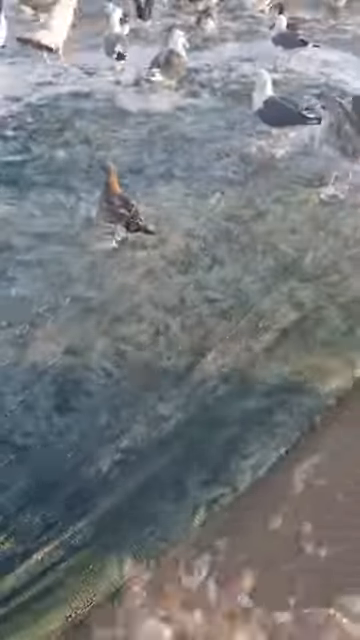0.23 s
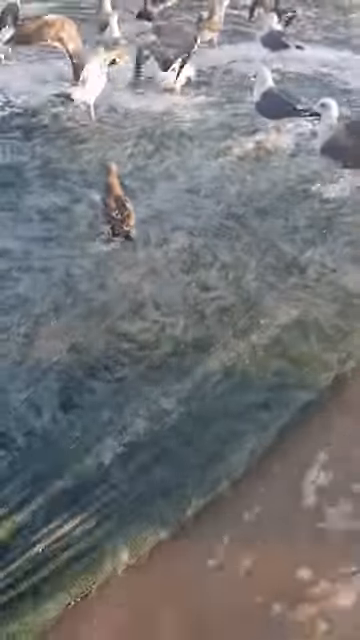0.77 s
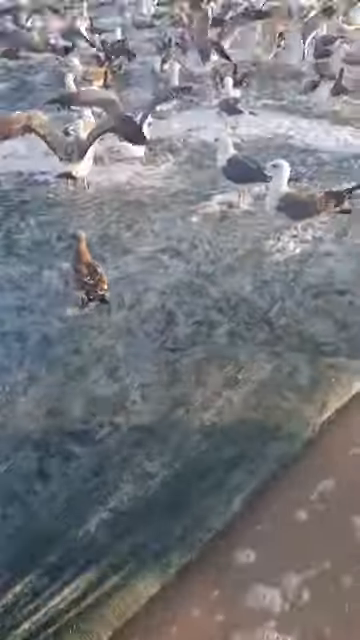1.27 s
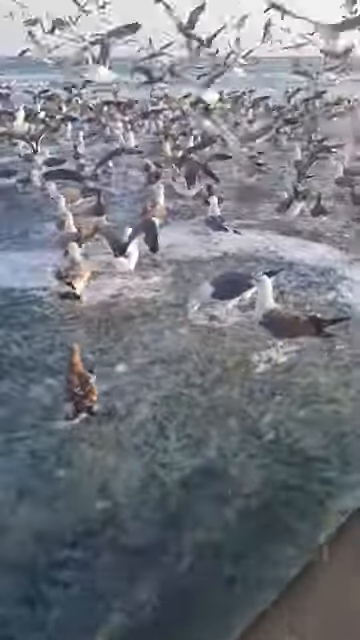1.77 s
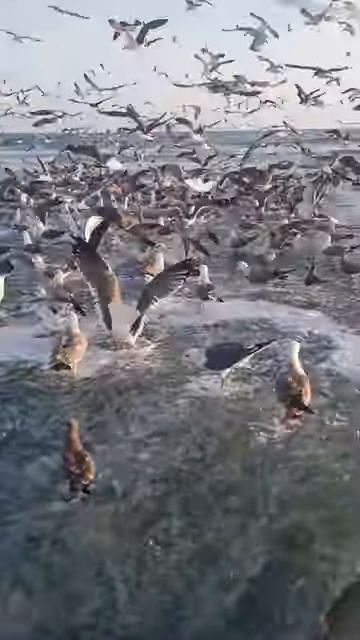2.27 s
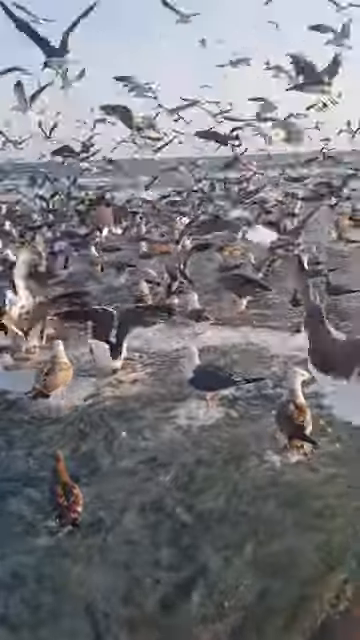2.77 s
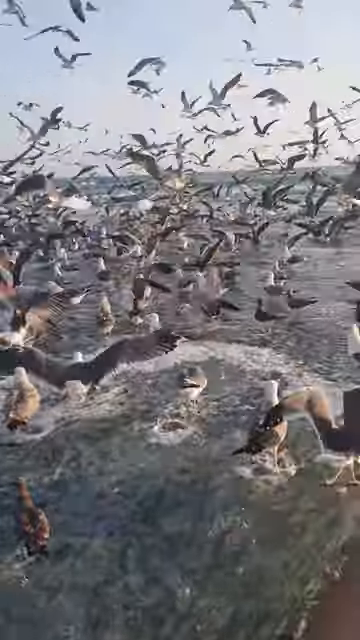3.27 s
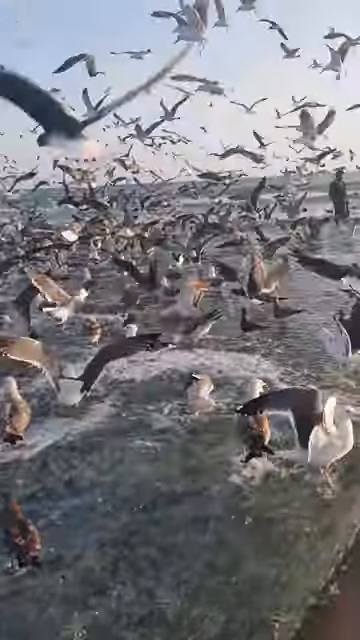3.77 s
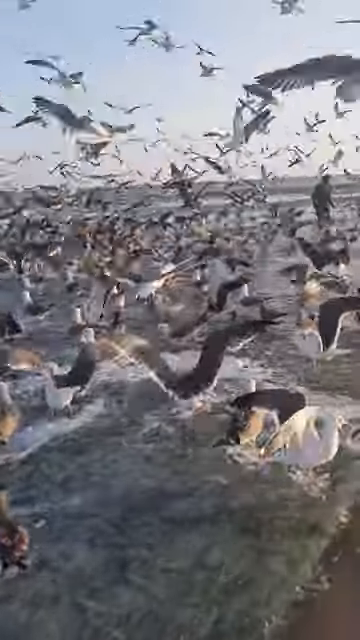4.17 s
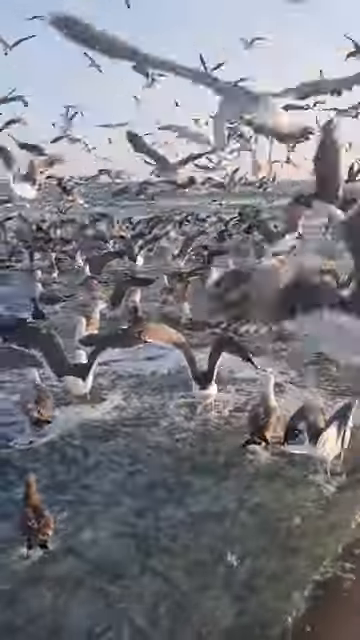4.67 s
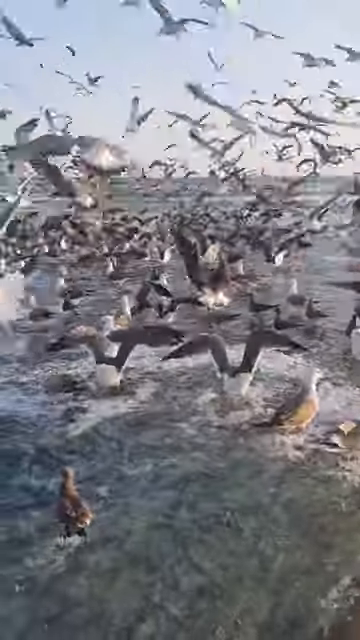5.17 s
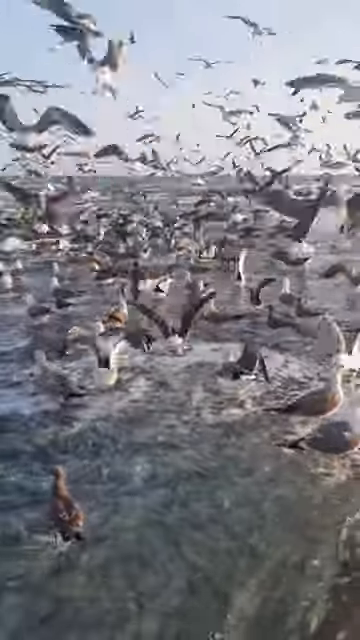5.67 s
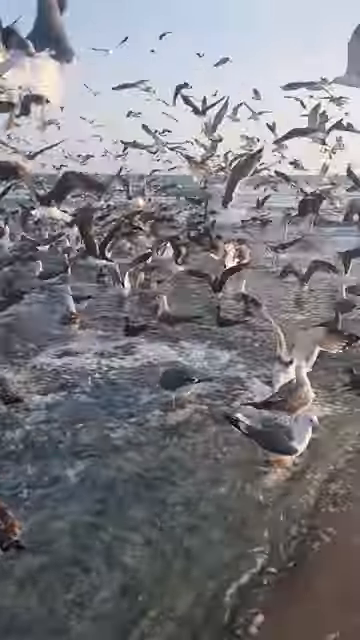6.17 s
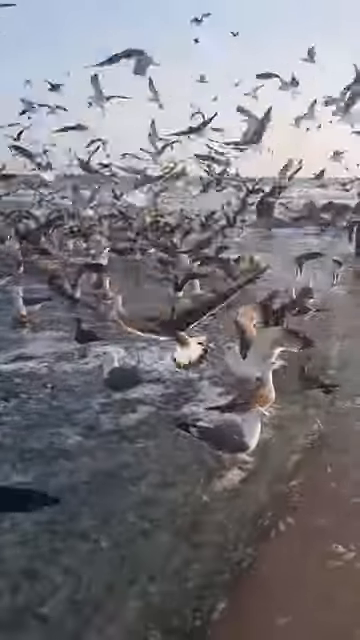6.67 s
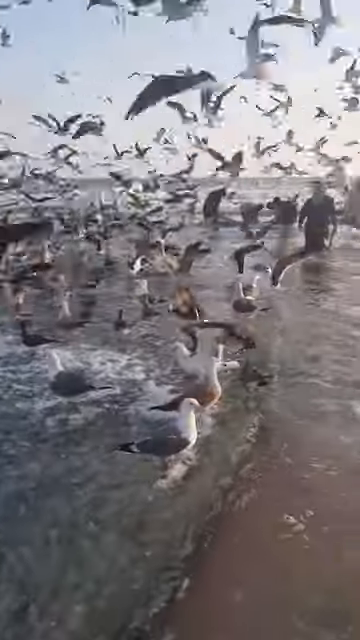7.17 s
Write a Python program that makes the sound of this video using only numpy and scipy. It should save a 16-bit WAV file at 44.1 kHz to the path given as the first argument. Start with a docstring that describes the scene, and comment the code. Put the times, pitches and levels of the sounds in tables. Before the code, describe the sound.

An open beach with a large gull flock, in stereo, lasting about 7.4 s. At first quiet, hoarse single squawks sit over soft low surf and a faint far chorus. From about 1 s near calls come faster and louder, short nasal barks around 1000 Hz in pitch, mostly slightly right, with a faint hollow knock at 1.6 s. Rough, rattling squawks stand out at 2.1 and 2.8 s. Two or three sharp snaps click around 3.5-3.65 s, then strong spaced calls continue to 4.7 s. A young gull squeals high and piercing, breaking in pitch, at 4.8-5.05 s and again at 5.4-5.6 s, amid the loudest squawks. The surf lifts near 5.6 s. From 5.8 to 6.7 s near calls fade to weak croaks with small clicks and drips, and the distant chorus thins. After 6.75 s moderate squawks return and the far flock swells. Bubbles and fine spray spit throughout.

```python
"""Gulls squabbling at the water's edge

Near gulls squawk one by one: pulses and bursts of air, coloured by throat and beak. A young one squeals
with both sides of its voice organ, two sines that mix. Many distant calls blur into a chorus.
Surf made of noise bands washes below, with ringing bubbles that plop and spit, beak snaps, drops and a
hollow knock. Two spaced microphones listen.
"""
import sys
import numpy as np
from scipy import signal
from scipy.fft import rfft, irfft
from scipy.io import wavfile
from scipy.ndimage import uniform_filter1d

SR = 44100
rng = np.random.default_rng(int(sys.argv[2]) if len(sys.argv) > 2 else 0)


def digitize_waveform(pressure):
    """Quantize a signal to 16-bit integers and store it at the path in sys.argv[1].

    Rows of a 2-D input are taken as channels; values are limited to [-1, 1].
    """
    field = np.atleast_2d(pressure).T
    bounded = np.clip(field, -1, 1)
    quanta = np.round(bounded * 32767).astype(np.int16)
    wavfile.write(sys.argv[1], SR, quanta)


N = 326781   # length in samples


def from_db(db):
    """Turn a level in dB into a gain."""
    return 10 ** (np.asarray(db) / 20)


def rms_one(x):
    """Scale a sound to an rms level of 1."""
    return x / np.sqrt(np.mean(x ** 2) + 1e-20)


def at_hz(points, hz):
    """Read a curve between its points, on a logarithmic frequency axis."""
    point_hz, value = np.transpose(points)
    return np.interp(np.log(hz), np.log(point_hz), value)


def drift(rate_hz, size=N):
    """Slow random wandering with spread 1: noise through two equal one-pole low-passes."""
    r = np.exp(-2 * np.pi * rate_hz / SR)
    noise = rng.standard_normal(size + 8000)
    slow = signal.lfilter([1], [1, -2 * r, r * r], noise)[8000:]   # drop the filter's start-up
    return rms_one(slow - slow.mean())


def bandpass(x, order, low_hz, high_hz):
    """Keep one band of frequencies."""
    return signal.sosfilt(signal.butter(order, [low_hz, high_hz], "band", fs=SR, output="sos"), x)


def highpass(x, order, hz):
    """Keep what lies above a frequency."""
    return signal.sosfilt(signal.butter(order, hz, "high", fs=SR, output="sos"), x)


def add(out, x, start_s, late_ms, pan_db):
    """Mix a sound in; the left microphone hears it late_ms later and pan_db softer than the right."""
    for side, sign in enumerate((1, -1)):
        delay_ms = (1 + sign) / 2 * late_ms
        i = int(max(start_s * SR + delay_ms * SR / 1000, 0))
        out[side, i:i + len(x)] += from_db(-sign * pan_db / 2) * x[:N - i]


def squawk(rise_s, fall_s, pitch, rough, beak_hz, throat_db, high_db, throb):
    """Membrane pulses, unsteady and mixed with bursts of air when rough, coloured by throat and open beak."""
    t = np.arange(int((rise_s + fall_s) * SR) + 2) / SR
    size = len(t)
    rough = np.clip(rough, 0, 1)

    arch = np.interp(t, [.012, rise_s, rise_s + fall_s - .012], pitch)
    hz = uniform_filter1d(arch, 300, mode="nearest") * (1 + .038 * rough * drift(200, size=size))
    phase = 2 * np.pi * np.cumsum(hz) / SR
    order = np.arange(1, int(15000 // max(pitch)))[:, None]
    pulses = np.cos(order * phase + 0.124 * order ** 2).sum(0)
    # alternating strong and weak cycles add tones halfway between the harmonics
    pulses *= 1 + rough * drift(40, size=size) * np.cos(phase / 2)
    rasp = rms_one(rng.standard_normal(size) * (1 + np.cos(phase)))   # one air burst per cycle
    air_share = .05 + .6 * rough ** 3
    source = np.sqrt(1 - air_share) * rms_one(pulses) + np.sqrt(air_share) * rasp

    f = np.fft.rfftfreq(size, 1 / SR) + 1
    width_octaves = np.where(f > beak_hz, .4, .42)
    beak = 1 / (1 + (np.log2(f / beak_hz) / width_octaves) ** 2) ** 2
    beak += 0.48 / (1 + ((f - 1.527 * beak_hz) / 700) ** 2)   # second resonance of the gape
    throat = from_db(throat_db) / (1 + (600 / f) ** 8) / (1 + ((f - 1500) / 600) ** 2)
    hiss = from_db(high_db - 3.5) / (1 + (5000 / f) ** 4) / (1 + f / 8000)
    body = irfft(rfft(source) * (beak + throat), size)
    edge = irfft((0.63 * rfft(source) + 0.66 * rfft(rasp)) * hiss, size)

    effort = np.interp(t, [0, rise_s, rise_s + fall_s], [.03, 1, .03])
    swell = np.sin(np.pi / 2 * effort) ** 1.414
    voice = rms_one(body + edge * swell ** 0.52)   # brightest at full effort
    # a rattle of about 86 Hz chops the voice into bursts, then dies away
    rattle = np.cos(2 * np.pi * 86 * (t - rise_s) + 0.71 * drift(21, size=size))
    beat = np.exp(throb * np.exp(-t / 0.12) * (rattle - 1))
    return voice * swell * beat * from_db(2.5 * rough * drift(90, size=size))


def near_gulls():
    """Single squawks; birds to the right reach the left microphone late and softer."""
    # one near squawk per row: start/s, loudest moment/s, end/s, top pitch f/Hz, pitch arch/share of top,
    # level/dB, roughness (held to 0-1), beak resonance f/Hz, setting of the high hiss/dB, left ear late/ms
    squawks = [(0.064, 0.098, .12, 1400, 0, -39, 0.85, 1530, -14, -0.091),
               (0.148, .184, .21, 1187, 0, -32.5, 1, 1290, -7, 0.15),
               (0.192, 0.246, .28, 924, 0.083, -22, 0, 4400, -17, .21),
               (0.292, .313, .39, 906, 0.015, -31, 1.2, 3900, -13, 0.2),
               (0.389, 0.435, .465, 937, 0.21, -23.5, .15, 3700, -11.5, 0.2),
               (0.534, 0.55, .588, 862, 0.075, -28, 0.62, 2300, -11, -0.0076),
               (0.646, 0.679, .705, 805, .03, -31, 0.96, 1660, -14, 0),
               (0.709, 0.73, .775, 1085, 0, -28.5, 1.1, 2920, -12, 0),
               (0.861, 0.883, .924, 867, .09, -28, 1.1, 2500, -11.5, 0.022),
               (.942, 0.971, 1.005, 675, 0.14, -24, 0.07, 3000, -18, 0.23),
               (0.984, 0.996, 1.03, 872, .05, -25, 1.07, 1750, -15, 0.2),
               (1.04, 1.068, 1.122, 1055, 0.2, -18, 0.42, 3620, -13.5, 0.21),
               (1.142, 1.182, 1.217, 917, 0.19, -22, 0.2, 3400, -11, .22),
               (1.231, 1.267, 1.318, 995, 0.3, -19.5, .4, 3320, -3, 0.043),
               (1.381, 1.427, 1.5, 777, 0.083, -31.5, 0.9, 2100, -8, -0.24),
               (1.567, 1.6, 1.626, 900, 0.17, -30, .6, 2140, -8, -0.046),
               (1.652, 1.688, 1.726, 1041, 0.19, -16.5, 0.54, 3240, -15, 0.22),
               (1.751, 1.798, 1.85, 988, 0.24, -20, 0.48, 3240, -13.5, 0.22),
               (1.857, 1.91, 1.95, 1036, 0.19, -18, 0.37, 3500, -15.5, 0.22),
               (1.939, 1.962, 2.03, 1083, 0.25, -26, 0.42, 3370, -12, 0.26),
               (2.075, 2.083, 2.192, 1172, .02, -17.5, 1.1, 2980, -7, 0.38),
               (2.182, 2.238, 2.315, 1002, .11, -26.5, 1, 2560, -14, 0.075),
               (2.38, 2.413, 2.45, 897, 0.11, -25.5, 0.82, 2560, -23, 0),
               (2.524, 2.56, 2.602, 1001, 0.057, -17, 1.1, 3200, -15, -0.13),
               (2.631, 2.668, 2.7, 830, 0.0043, -33, 1.1, 1680, -20, -0.24),
               (2.711, 2.731, 2.779, 857, 0.057, -16, 0.83, 3450, -11, 0.36),
               (2.791, 2.812, 2.857, 1199, 0.034, -12.5, 0.67, 3230, -6, .46),
               (2.918, 2.948, 2.97, 885, 0, -31.5, 0.96, 2510, -9, 0.2),
               (2.974, 2.993, 3.04, 924, 0.18, -24, 0.4, 2290, -21, 0.17),
               (3.064, 3.128, 3.169, 1014, 0.063, -14, 0.97, 3000, -32, 0.27),
               (3.196, 3.308, 3.33, 999, 0.014, -30, 1.05, 2880, -19, 0.29),
               (3.335, 3.362, 3.428, 1077, 0.14, -21, 0.83, 3200, -6.5, .36),
               (3.647, 3.677, 3.725, 1085, 0.26, -20.5, 0.64, 2620, -15, 0),
               (3.761, 3.818, 3.849, 1102, 0.038, -33, 0.9, 2880, -14, 0.3),
               (3.879, 3.929, 3.977, 868, 0.22, -19, 0.71, 2720, -8.5, -0.069),
               (3.991, 4.005, 4.06, 992, 0.032, -30, 0.77, 2810, -17, 0.31),
               (4.129, 4.208, 4.245, 985, 0.098, -20.5, 0.78, 2570, -17.5, 0),
               (4.327, 4.345, 4.418, 1075, 0.11, -16.5, 0.66, 3000, -14.5, .06),
               (4.495, 4.542, 4.583, 1096, .07, -13, 0.72, 2710, -14.5, 0),
               (4.612, 4.659, 4.68, 1087, 0.07, -32, .77, 3200, -14, 0.078),
               (4.686, 4.712, 4.77, 927, .02, -23.5, 1.1, 2100, -20, 0.22),
               (4.99, 5.011, 5.062, 1113, .06, -17, 1.06, 2720, -16, .1),
               (5.07, 5.119, 5.26, 1096, 0.11, -33, .5, 3040, -17.5, 0.296),
               (5.349, 5.371, 5.395, 1275, 0.12, -12, 0.53, 3080, -15.5, .15),
               (5.389, 5.419, 5.445, 1242, 0.013, -19.5, 0.56, 3260, -15, 0.16),
               (5.536, 5.57, 5.61, 1145, .04, -18.5, 1, 3520, -24, .27),
               (5.597, 5.631, 5.69, 1066, 0.036, -16, 0.8, 2780, -20, 0.3),
               (5.244, 5.267, 5.3, 898, .05, -35, .8, 1500, -22, 0.14),
               (5.718, 5.75, 5.908, 1135, 0.046, -29.5, 0.93, 2670, -9.5, .29),
               (6.064, 6.067, 6.15, 798, 0, -37.5, 1.1, 2110, 0, 0.072),
               (6.255, 6.285, 6.31, 776, 0, -38.5, 0.65, 1670, -1, 0.38),
               (6.345, 6.368, 6.39, 793, 0, -42.5, 1.1, 1500, 19, 0.27),
               (6.417, 6.466, 6.49, 869, .16, -33, 0, 3060, -7, 0.21),
               (6.657, 6.728, 6.745, 650, 0.12, -33.5, 0.93, 1400, -21, 0.14),
               (6.741, 6.765, 6.815, 830, 0.087, -23, 0.88, 2880, -24, 0.12),
               (6.867, 6.9, 6.925, 1420, 0.035, -33, 0.85, 2800, -14, 0.078),
               (6.944, 7.028, 7.07, 1008, .12, -25.5, 0.71, 2850, -24, 0.25),
               (7.076, 7.112, 7.175, 1174, 0.18, -24, 0.6, 3170, -12, -0.22),
               (7.188, 7.208, 7.259, 1150, 0.0082, -29.5, 1.1, 2300, -14, 0.2),
               (7.265, 7.286, 7.381, 810, 0.011, -30.5, 1.1, 2500, -12, 0.14)]
    # moments inside the squawks that a rattle breaks up: t/s
    rattling_s = [2.09, 2.81]
    out = np.zeros((2, N))
    for start, top, end, top_hz, arch, level_db, rough, beak_hz, high_db, late_ms in squawks:
        throb = 2.4 * any(start < s < end for s in rattling_s)
        # the pitch climbs to its top, then sinks by 0.9 of that climb
        pitch = top_hz * (1 - np.clip(arch, 0, .5) * np.array([1, 0, .9]))
        throat_db = -6.5 - 0.66 * (level_db + 19)   # louder calls have a smaller share of throat
        call = squawk(top - start + 0.00932, end - top + 0.0084, pitch, rough, beak_hz,
                      throat_db, high_db, throb)
        add(out, from_db(level_db) * call, start - .01, late_ms, -.5 + 22 * late_ms)
    return out


def yelp(start, climb_s, hold_s, start_hz, top_hz, before_db, after_db):
    """Points (s, Hz, dB) of a high note: a climb, a break down to one pitch, a sagging and fading hold."""
    break_s, landing_hz, sag_hz_per_s, fade_db = 0.013, 3343, 2500, -3
    top_s = start + climb_s
    landed = top_s + break_s
    return [(start, start_hz, before_db), (top_s, top_hz, before_db), (landed, landing_hz, after_db),
            (landed + hold_s, landing_hz - sag_hz_per_s * hold_s, after_db + fade_db)]


def pipe(start, swell_s, fade_s, start_hz, level_db):
    """Points (s, Hz, dB) of a low note: a swell and fade on a sagging pitch."""
    sag_hz_per_s, edge_db = 3030, -6.5
    return [(start + s, start_hz - sag_hz_per_s * s, level_db + db)
            for s, db in ((0, edge_db), (swell_s, 0), (swell_s + fade_s, edge_db))]


def whistle(notes):
    """One membrane: an unsteady, fluttering sine along each note."""
    out = np.zeros(N)
    for note in notes:
        s, hz, db = np.transpose(note)
        i = np.arange(int(s[0] * SR), int(s[-1] * SR))
        unsteady_hz = np.interp(i / SR, s, hz) * (1 + 0.026 * drift(260, size=len(i)))
        phase = 2 * np.pi * np.cumsum(unsteady_hz) / SR
        level = from_db(np.interp(i / SR, s, db) + 3.15 * drift(74, size=len(i)))
        out[i] += np.sqrt(2) * level * np.sin(phase) * signal.windows.tukey(len(i), .15)
    return out


def young_gull():
    """Two voices share one windpipe: squaring their sum gives octaves and the sum tone; air rasps along."""
    # high voice: start/s, climb time/s, hold time/s, start f/Hz, top f/Hz,
    # level before the break/dB, level after it/dB
    yelps = [(4.79, 0.012, 0.047, 3216, 3350, -28.5, -20), (4.855, 0.058, 0.069, 4490, 5180, -22.5, -17.5),
             (5.43, .013, 0.056, 5040, 4950, -26, -15.5), (5.506, .02, 0.0175, 4360, 4450, -23, -16)]
    # low voice: start/s, swell time/s, fade time/s, start f/Hz, level/dB
    pipes = [(4.818, 0.013, .016, 2403, -9), (4.932, 0.012, 0.038, 2520, -27.5),
             (4.995, 0.026, .011, 2335, -18), (5.46, 0.015, 0.025, 2564, -18.5),
             (5.535, 0.032, .052, 2527, -17)]
    both = whistle([yelp(*row) for row in yelps]) + whistle([pipe(*row) for row in pipes])
    size = uniform_filter1d(np.abs(both), 200) + 0.0059   # running loudness, kept above zero
    mixed = bandpass(both ** 2 / size, 3, 4200, 7500)
    air = bandpass(rng.standard_normal(N), 1, 1500, 7000)
    voice = both + 0.52 * mixed + 0.23 * (size - .005) * air

    out, split = np.zeros((2, N)), int(5.2 * SR)
    add(out, voice[:split], 0, .08, 0.3)   # it shifts sideways between its two bouts
    add(out, voice[split:], split / SR, .24, 4.5)
    return out


def ring(hz, t60):
    """A struck body: one sine that dies away by 60 dB in t60 seconds."""
    t = np.arange(int(t60 * SR)) / SR
    return np.sin(2 * np.pi * hz * t) * from_db(-60 * t / t60) * np.minimum(t * hz / 0.93, 1)


def small_hits():
    """Snaps a little to the right, a crack of noise with a brief ring; and a hollow knock in the middle."""
    # beak snaps and drops: t/s, level/dB, ring f/Hz
    snaps = [(3.46, -20, 2420), (3.593, -11.5, 2110), (3.6446, -10.5, 590), (5.1892, -28.5, 3300),
             (5.7854, -20.5, 3310), (6.137, -19, 2250), (6.1866, -23, 3950), (6.5266, -23, 1190),
             (6.629, -20, 1330)]
    # hollow knock: t/s, f/Hz, level/dB, time to die away by 60 dB/s
    knocks = [(1.602, 194, -28.5, 0.36)]
    out = np.zeros((2, N))
    for s, level_db, hz in snaps:
        snap = ring(hz, 0.02)
        t = np.arange(len(snap)) / SR
        snap += hz / 4000 * rng.standard_normal(len(snap)) * from_db(-60 * t / 0.0087)
        add(out, from_db(level_db) * snap, s, .2, 4.0)
    for s, hz, level_db, t60 in knocks:
        add(out, from_db(level_db) * ring(hz, t60), s, 0, 0)
    return out


def wet_sand(x, echo_db=-6.0, spread_s=0.018):
    """Scattered early echoes off sand, water and wings, different ones at each microphone."""
    t = np.arange(int(.15 * SR)) / SR
    chosen = rng.random((2, len(t))) < .08
    taps = rng.standard_normal((2, len(t))) * chosen * np.exp(-t / spread_s) * (t > .001)
    taps *= from_db(echo_db) / np.sqrt(np.sum(taps ** 2, 1, keepdims=True))
    return x + signal.fftconvolve(x, taps, axes=1)[:, :N]


def far_flock(chorus_db, count=360):
    """Many distant calls at random moments and bearings, dulled to one colour and evened in level."""
    # colour of the far chorus: f/Hz, level per Hz/dB
    chorus = [(290, -23), (500, -3), (637, -8), (1080, -2), (2290, -5), (2530, -10), (2960, -5),
              (6900, -20.5), (9000, -27), (11700, -92), (19800, -120)]
    out = np.zeros((2, N))
    for when, pitch, length, rough, size, bearing in rng.random((count, 6)):
        hz = 650 + 700 * pitch
        arch_hz = [(.8 + .15 * rough) * hz, hz, (.8 + .2 * size) * hz]
        call = squawk(.025 + .03 * length, .03 + .04 * length, arch_hz, .6 + .4 * rough, 2000, 7.5, -20, 0)
        add(out, from_db(12 * size) * call, when * N / SR, .7 * bearing - .2, 10 * bearing - 3)
    f = np.fft.rfftfreq(N, 1 / SR) + 1
    spec = rfft(out)
    flat = np.sqrt(uniform_filter1d(np.mean(np.abs(spec) ** 2, 0), 2500)) + 1e-9
    out = irfft(spec / flat * from_db(at_hz(chorus, f)), N)
    even = np.sqrt(uniform_filter1d(np.mean(out ** 2, 0), 3000))   # no single far call stands out
    return from_db(chorus_db) * out / even


def surf(wash_db, patchy_db=2.5):
    """Half-octave bands of stereo noise, each flickering on its own and all lifted by small waves."""
    # colour of the surf: f/Hz, level/dB
    wash = [(25, -42), (90, -10), (210, 0), (450, -4), (900, -9), (2000, -16), (5000, -22), (9000, -25),
            (16000, -26)]
    # how alike left and right are: f/Hz, likeness (1 = the same)
    likeness = [(60, 1), (240, 0.65), (950, 0.16), (3770, 1), (15000, 0.3)]
    out, edges = 0, 25 * 2 ** np.arange(0, 9.6, .5)
    white = rng.standard_normal((2, 2, N))
    sloshing = drift(5)   # small waves lift all bands together
    for k, (low, high) in enumerate(zip(edges, edges[1:])):
        mid, side = bandpass(white[k % 2], 2, low, high)
        hz = np.sqrt(low * high)
        alike = np.clip(at_hz(likeness, hz), -1, 1)
        gain = from_db(at_hz(wash, hz) + patchy_db * (drift(10) + .8 * sloshing))
        out = out + gain * (np.sqrt(1 + alike) * mid + np.sqrt(1 - alike) * side * [[1], [-1]])
    return from_db(wash_db) * rms_one(out)


def bubbles(wash_db, per_s, over_db, low_hz, high_hz, cycles):
    """Random bubbles that ring a few cycles with rising pitch, at random bearings, following the surf."""
    out = np.zeros((2, N))
    for when, pitch, size, bearing in rng.random((400, 4))[:int(per_s * N / SR)]:
        hz = low_hz * (high_hz / low_hz) ** pitch
        turns = np.arange(int(cycles / hz * SR)) * hz / SR
        rising = np.sin(2 * np.pi * turns * (1 + 0.14 * turns / cycles))
        blip = rising * from_db(-40 * turns / cycles) * np.minimum(turns / 3.1, 1)
        level = from_db(over_db + 14 * (size - .5))
        add(out, level * blip, when * N / SR, .7 * bearing - .2, 10 * bearing - 3)
    return from_db(wash_db) * out


def scene():
    """All sources at the two microphones."""
    # far flock swelling and falling quiet: t/s, level/dB
    flock_swell = [(0.0, -41), (0.31, -40), (0.76, -34), (0.91, -37.5), (1.14, -29), (1.51, -36),
                   (1.83, -31), (2.25, -30.5), (2.45, -39), (2.89, -32.5), (3.65, -35), (4.64, -32),
                   (5.2, -38), (5.59, -31), (6.27, -38.5), (6.73, -42.5), (6.93, -35.5), (7.41, -33)]
    # surf coming and going: t/s, level/dB
    swash = [(0.0, -46), (0.31, -48.5), (0.72, -45), (1.61, -49.5), (2.41, -47.5), (3.03, -40.5),
             (5.18, -45), (5.59, -37.5), (6.17, -43.5), (7.18, -45), (7.41, -50)]
    t = np.arange(N) / SR
    birds = wet_sand(near_gulls() + young_gull() + small_hits())
    chorus_db = np.interp(t, *np.transpose(flock_swell)) + 1.5 * drift(7.2)   # the level wavers
    wash_db = np.interp(t, *np.transpose(swash))
    # plops from feet and small waves, then drops of spray
    plops = bubbles(wash_db, per_s=16, over_db=10, low_hz=170.3, high_hz=644, cycles=17.4)
    drops = bubbles(wash_db, per_s=40, over_db=8.0, low_hz=5000, high_hz=13000, cycles=12.0)
    return birds + far_flock(chorus_db) + surf(wash_db) + plops + drops


def suppress(x, knee_db, slope):
    """Noise suppressor: what lies above 300 Hz is turned down whenever its level sinks under the knee."""
    upper = highpass(x, 2, 300)
    level_db = 10 * np.log10(uniform_filter1d(np.mean(upper ** 2, 0), 900) + 1e-12)
    cut_db = uniform_filter1d(np.clip(slope * (level_db - knee_db), -9, 0), 500)
    return x - upper * (1 - from_db(cut_db))


def record(dry):
    """The right microphone is brighter; quiet moments are suppressed, peaks rounded, deep bass and top cut."""
    treble = highpass(dry, 1, 6000)
    tilted = dry + treble * [[-.25], [.25]]
    quieted = suppress(tilted, knee_db=-34.0, slope=.35)
    rounded = .95 * np.tanh(quieted / .95)
    thin = highpass(rounded, 3, 70)
    # steep low-pass: 85 dB down from 16300 Hz upward
    return signal.sosfilt(signal.cheby2(22, 85, 16300, fs=SR, output="sos"), thin)


dry = scene()
out = record(dry)
digitize_waveform(out)
```